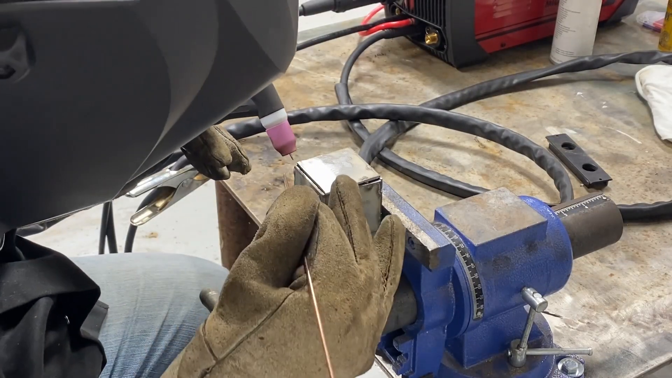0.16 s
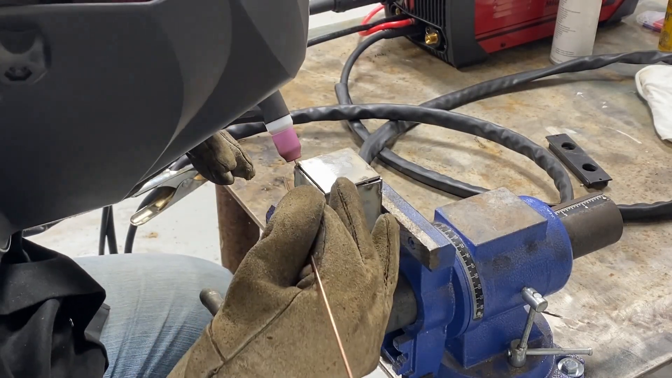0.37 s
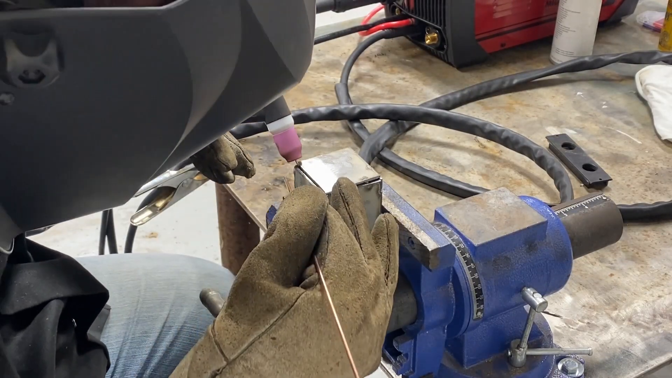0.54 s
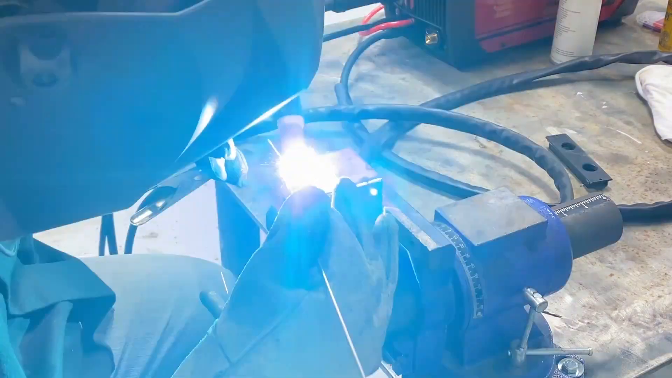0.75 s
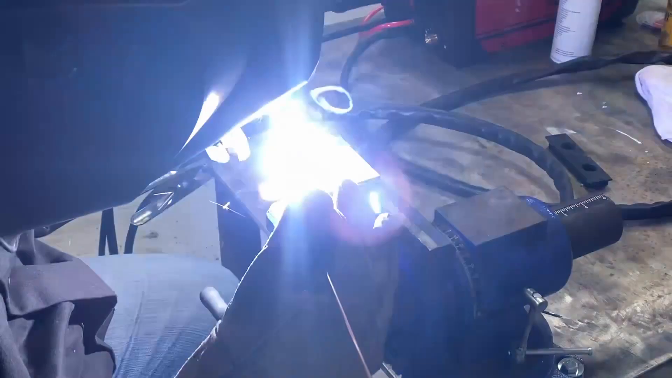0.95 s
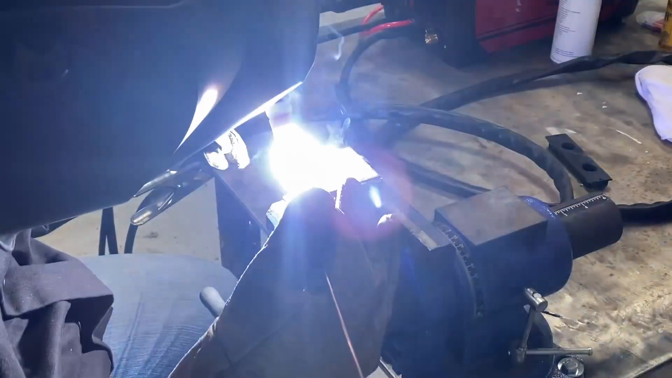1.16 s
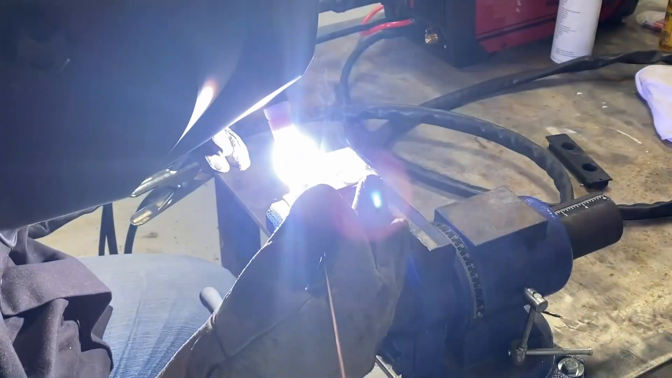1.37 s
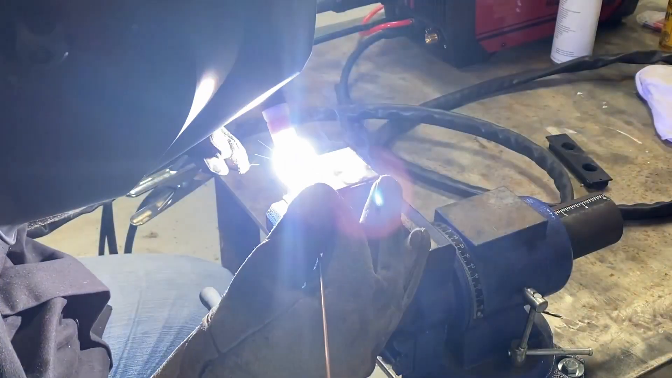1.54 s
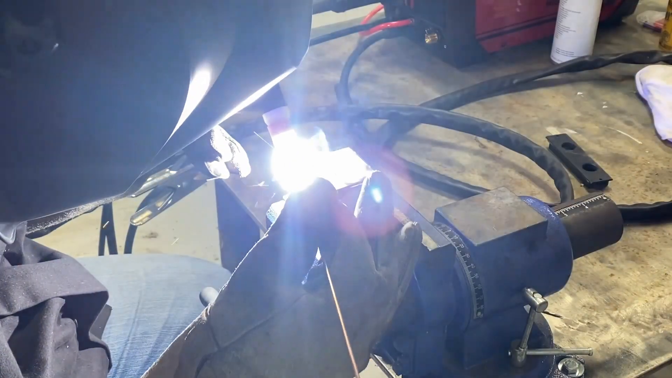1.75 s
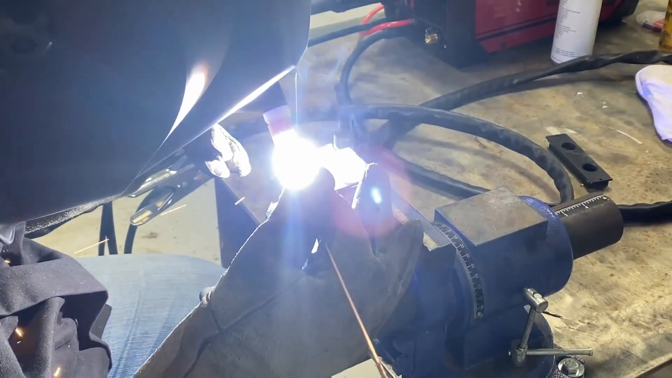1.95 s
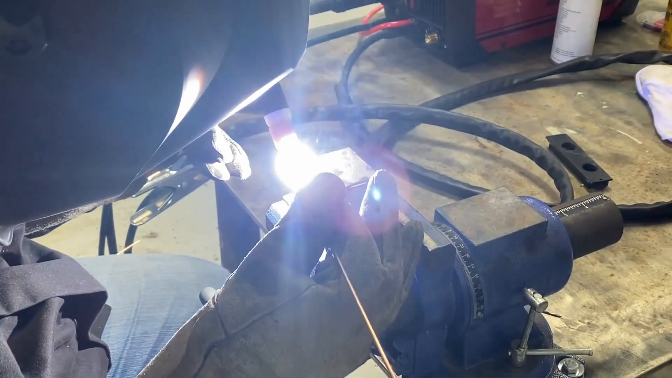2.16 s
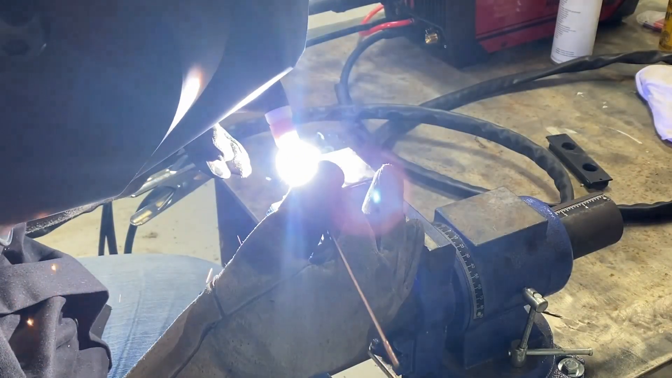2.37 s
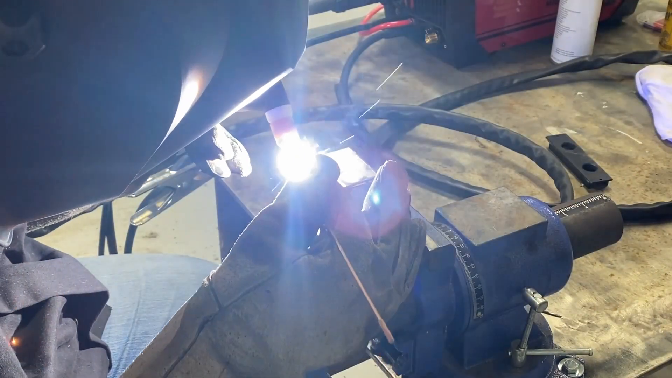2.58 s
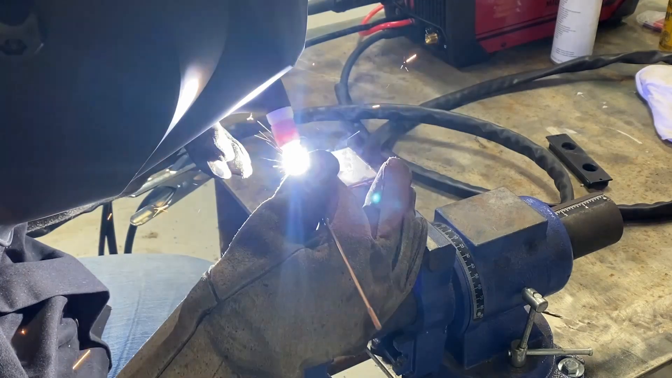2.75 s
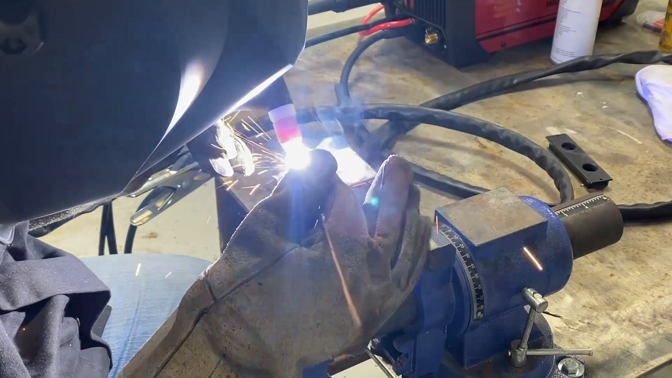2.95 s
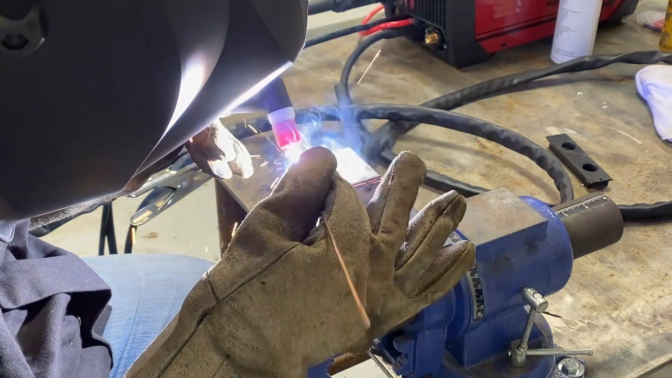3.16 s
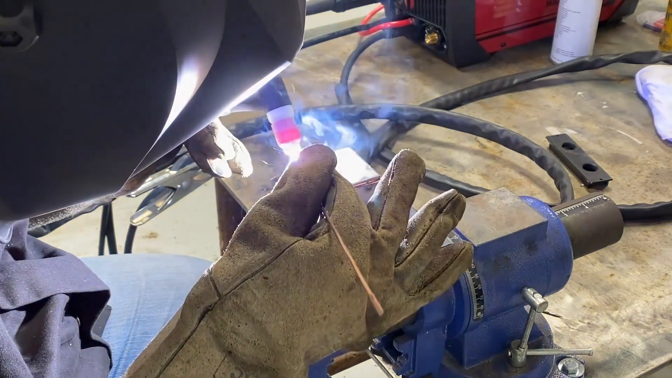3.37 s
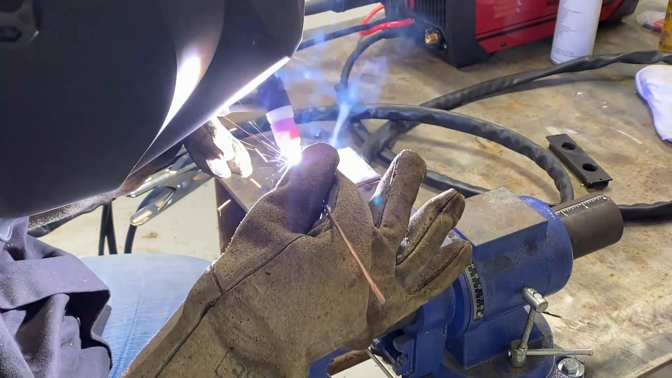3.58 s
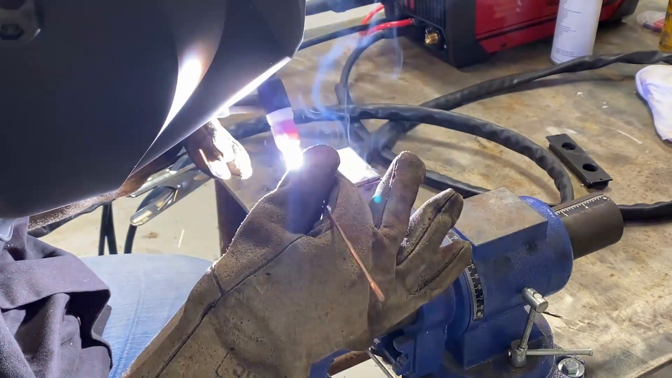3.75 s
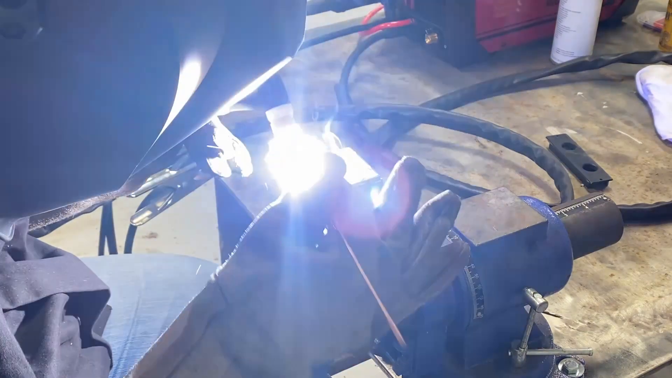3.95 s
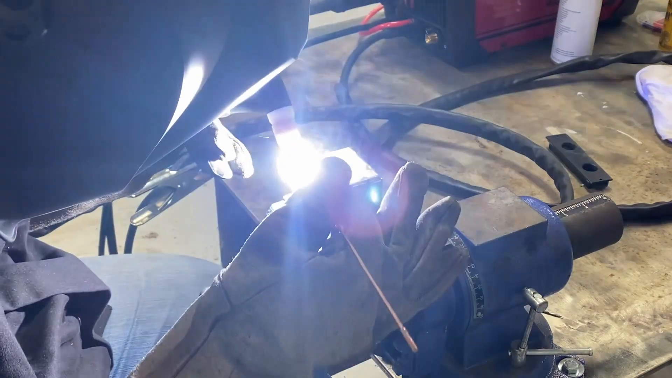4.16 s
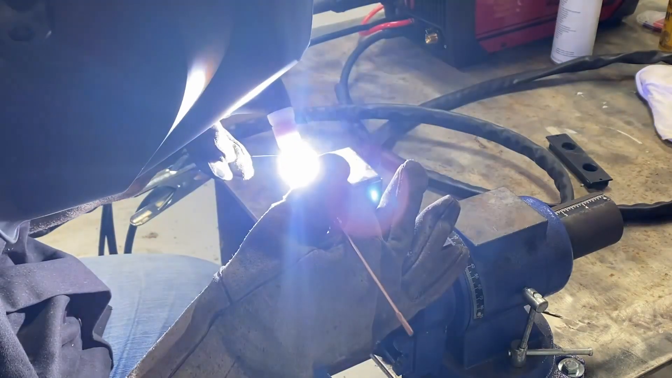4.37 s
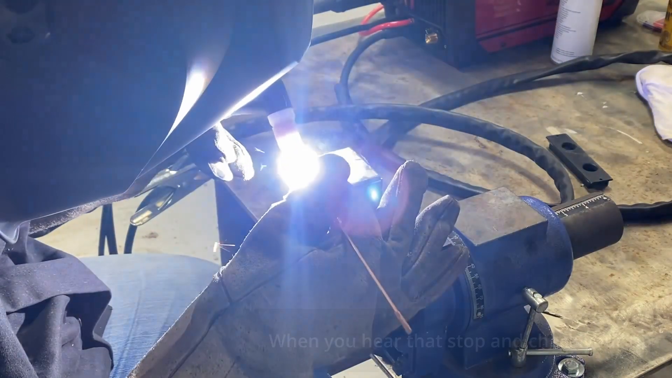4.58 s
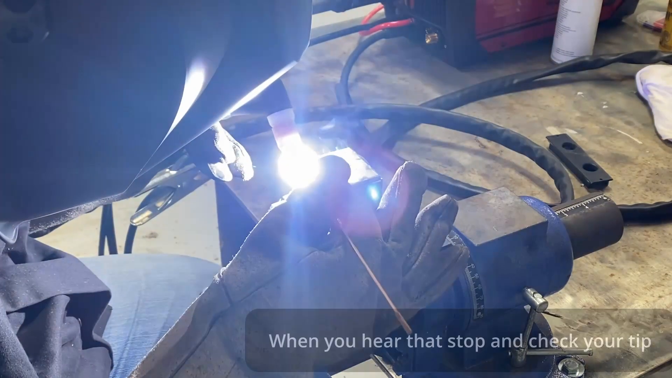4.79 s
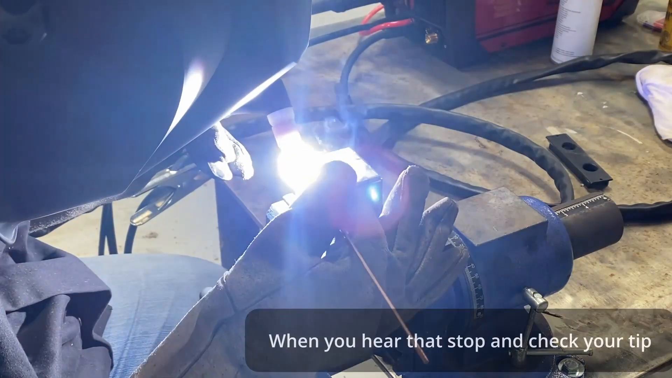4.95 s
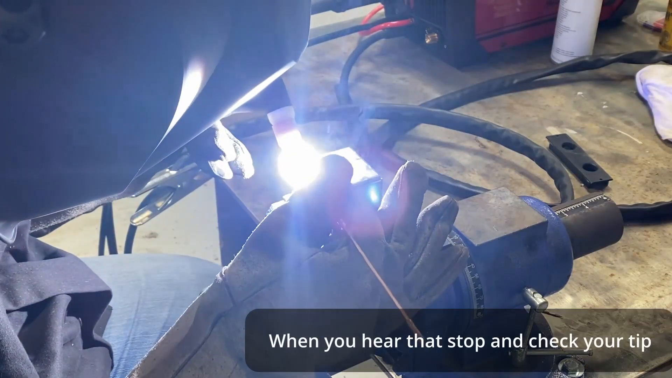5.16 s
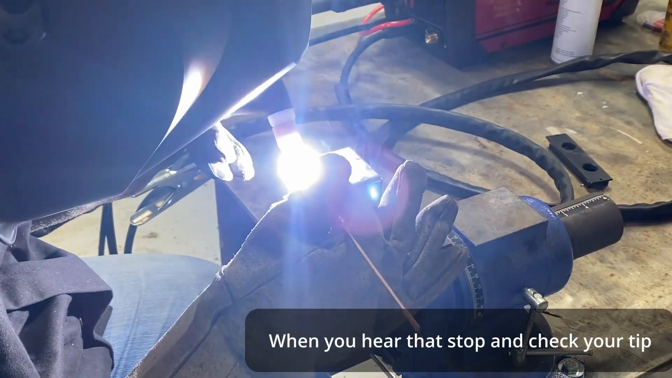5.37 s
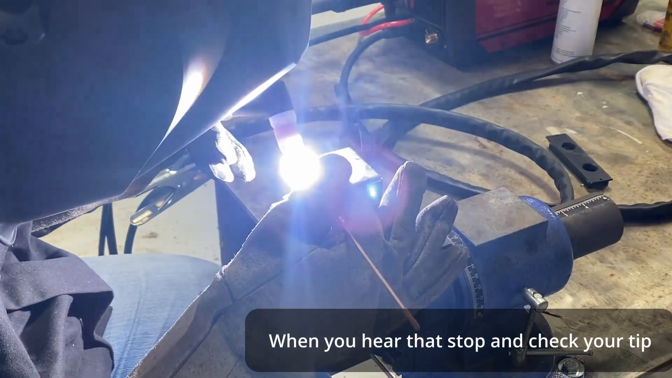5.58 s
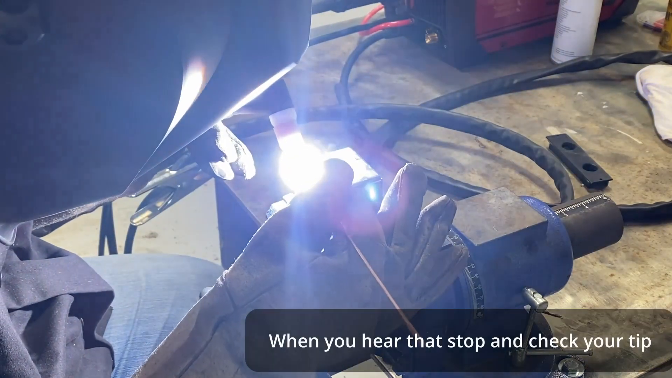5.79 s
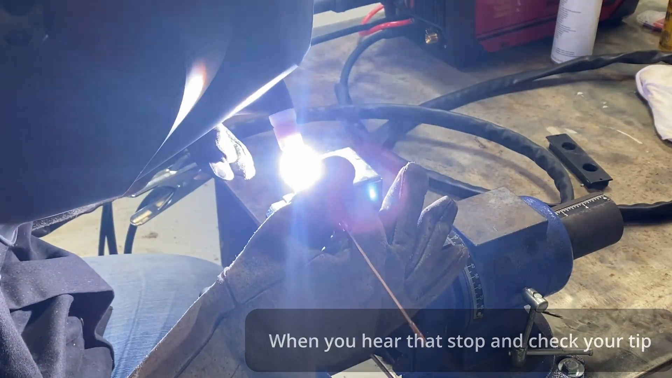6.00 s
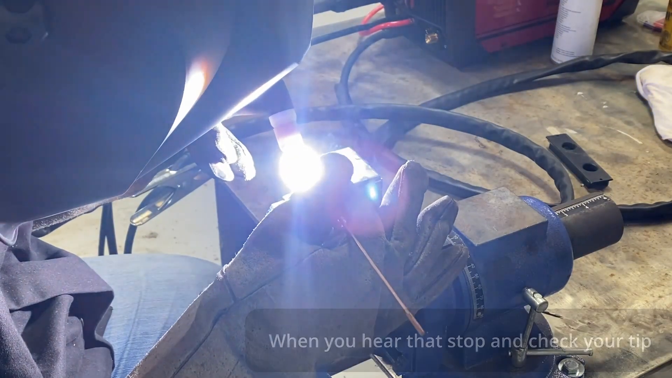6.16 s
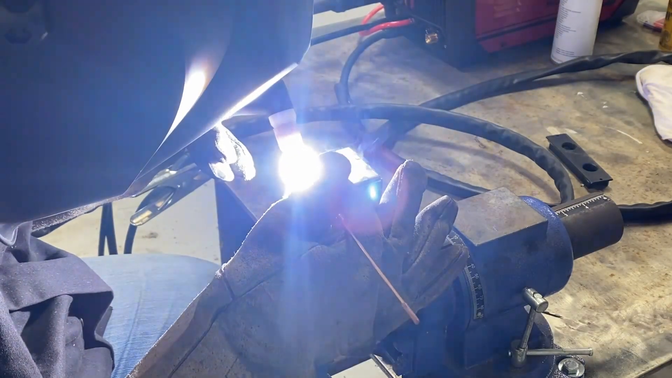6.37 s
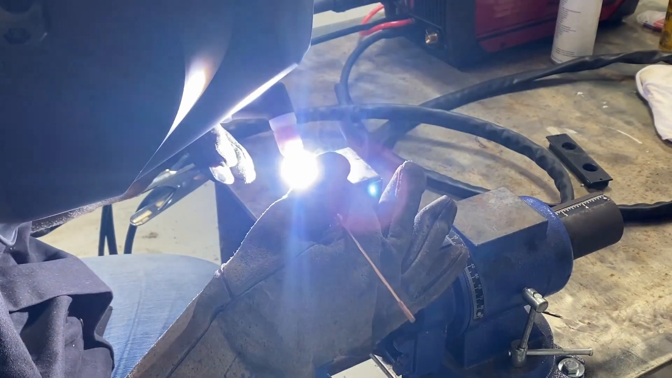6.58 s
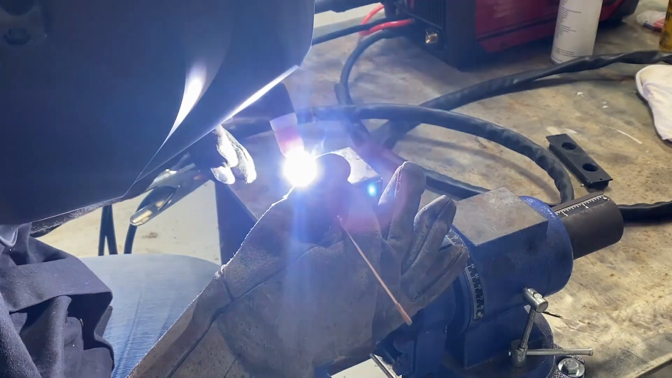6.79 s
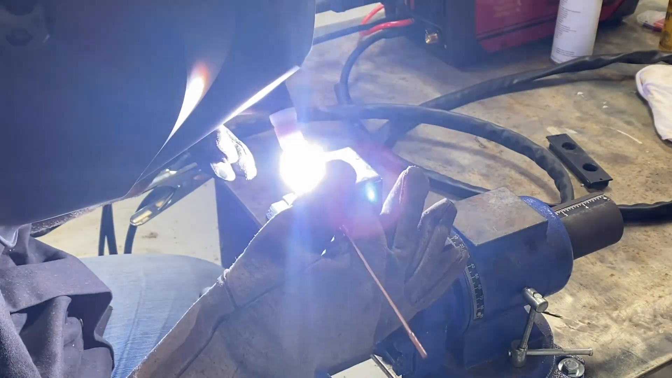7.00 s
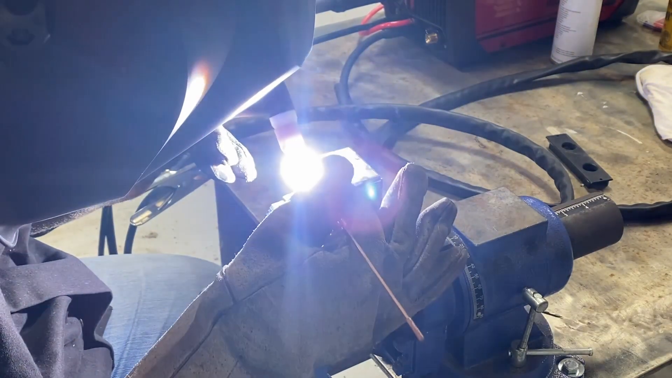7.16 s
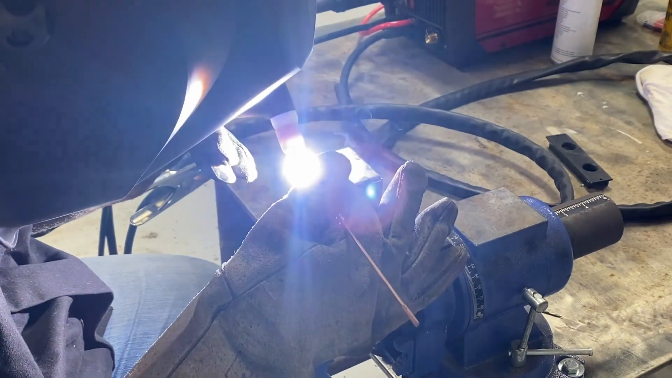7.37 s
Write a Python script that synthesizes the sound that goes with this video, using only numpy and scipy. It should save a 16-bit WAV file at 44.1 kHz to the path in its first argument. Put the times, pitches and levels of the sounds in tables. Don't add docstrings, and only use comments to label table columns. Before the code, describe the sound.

A machine fan drones, a contactor clacks, then a welding arc ignites in crackling pops and burns with a steady hiss and thin high whine.

```python
import sys
import numpy as np
from scipy import signal
from scipy.fft import rfft, irfft, next_fast_len
from scipy.io import wavfile
from scipy.ndimage import uniform_filter1d

SR = 44100
rng = np.random.default_rng(int(sys.argv[2]) if len(sys.argv) > 2 else 0)


def amplitude_ratio(level_db):
    exponent = np.asarray(level_db, float) / 20
    return 10 ** exponent


def store_pcm(level_fs):
    pcm = np.round(np.clip(level_fs, -1, 1) * 32767).astype(np.int16)
    wavfile.write(sys.argv[1], SR, np.atleast_2d(pcm).T)


N = 327691

# (frequency [Hz], likeness [0-1])
ALIKE = [(60, .996), (290, .94), (700, .87), (1410, .6), (1900, .85), (2250, .997), (3500, .95),
         (4600, .99), (5500, .9995), (6800, .9995), (7500, .985), (15000, .94)]


def clock(start):
    return np.arange(N) / SR - start


def evened(x):
    return x / np.sqrt(np.mean(x ** 2) + 1e-20)


def read(points, hz):
    f, value = np.transpose(points)
    return np.interp(np.log(hz + 1), np.log(f + 1), value)


def curves(rows, quiet=None):
    s, *columns = np.transpose(rows)
    return [np.interp(clock(0), s, c, quiet, quiet) for c in columns]


def band(x, low_hz, high_hz):
    sos = signal.butter(2, [low_hz, high_hz], "bandpass", fs=SR, output="sos")
    return signal.sosfilt(sos, x)


def coloured(x, points):
    half = read(points, np.fft.rfftfreq(4096, 1 / SR)) * np.log(10) / 20
    log_gain = np.r_[half, half[-2:0:-1]]
    taps = np.fft.ifft(np.exp(np.conj(signal.hilbert(log_gain)))).real[:2048]
    return signal.oaconvolve(np.atleast_2d(x), taps[None], axes=1)[:, :N]


def drift(rate_hz):
    knots = rng.standard_normal(int(N / SR * rate_hz) + 2)
    return evened(signal.resample(knots, N))


def likeness(hz):
    return np.clip(read(ALIKE, hz), 0, 1)[:, None]


def air(gain_db, patchy_db):
    frames, hz = N // 256 + 5, np.fft.rfftfreq(1024, 1 / SR)
    a, b, c, d, patches = rng.standard_normal((frames, 513, 5)).T
    patches = uniform_filter1d(patches, size=12, axis=0)
    patches = evened(uniform_filter1d(patches, size=14, axis=1))
    same = likeness(hz)
    left = a + 1j * b
    right = same * left + np.sqrt(1 - same ** 2) * (c + 1j * d)
    at = np.minimum(np.arange(frames) * 256, N - 1)
    z = np.array([left, right]) * amplitude_ratio(gain_db(hz[:, None], at) + patchy_db * patches)
    return signal.istft(z, nperseg=1024, noverlap=768)[1][:, :N]


def tones(lines, level_db, flutter_db, fading_db):
    out = np.zeros(N)
    for hz, db in lines:
        waver = 1.0 if hz > 6500 or 1000 < hz < 2000 else 0.68
        gain_db = db + 2.0 + level_db(hz) + flutter_db * drift(14) + fading_db * drift(3)
        phase = 2 * np.pi * hz * clock(0) + waver * drift(22) + 7 * rng.random()
        out += amplitude_ratio(gain_db) * np.sin(phase)
    return out


def fan():
    # (frequency [Hz], density [dB per Hz])
    drone_bands = [(15, -40), (25, 15.5), (70, -6.5), (165, -9), (313, 1), (365, -13.5), (518, -4.5),
                   (694, -11.5), (1400, -20), (1600, -21.5), (1760, -23.5), (1940, -23.5), (2600, -21.5),
                   (3380, -49), (5720, -120)]
    # (frequency [Hz], density [dB per Hz])
    top_bands = [(1800, -9.5), (2950, -15), (3180, 4.5), (3400, 7.5), (3750, -0.5), (5500, -6), (7000, -3),
                 (8500, -14.5), (9500, -13), (11500, -31), (14500, -23)]
    # (frequency [Hz], width [Hz], level [dB rms])
    duct_modes = [(82, 8, -56.5), (282, 10, -60), (326.25, 10, -59), (408, 58, -50.5), (512, 68, -55.5)]
    drone = amplitude_ratio(-42) * evened(air(lambda hz, at: read(drone_bands, hz), patchy_db=0.8))
    top = amplitude_ratio(-53) * evened(air(lambda hz, at: read(top_bands, hz) - 40 * (hz < 1500), patchy_db=-1.5))
    hz = np.fft.rfftfreq(N, 1 / SR)
    common, left, right = rfft(rng.standard_normal((3, N)))
    z = common + 0.34 * np.array([left, right])
    ducts = np.zeros((2, N))
    for f, width, db in duct_modes:
        ducts += amplitude_ratio(db) * evened(irfft(z / (1 + (2 * (hz - f) / width) ** 2), N))
    return drone + top + ducts


def hums():
    # (pitch [Hz], level [dB rms])
    hum_lines = [(284.5, -52.5), (325.3, -50)]
    # (time [s], lower hum [dB], upper hum [dB])
    hunting = [(0, 0, -5), (.45, 1, 2.5), (.8, -2, 0), (1.35, -3, 0), (1.6, -6, 4.5), (2.1, -2, 1),
               (2.5, -5, -1), (3.12, 5, 0.5), (3.4, -7, 1), (3.75, 7, 1), (4.25, 5, 1), (4.45, -11, 6),
               (4.8, -2, -5), (5.15, 2.5, 3), (5.8, -2, -0.5), (6.4, 3.5, 1), (7.0, 1.5, 1.5),
               (7.43, 0, -3)]
    lower_db, upper_db = curves(hunting)
    return tones(hum_lines, lambda hz: lower_db if hz < 300 else upper_db, flutter_db=2.5, fading_db=1.0)


def blade_whistles():
    # (frequency [Hz], level [dB rms])
    blade_lines = [(1615, -59.5), (1954, -63.5)]
    return tones(blade_lines, lambda hz: .1, flutter_db=2.0, fading_db=0.9)


def engine():
    # (start [s], length [s], first pitch [Hz], climb [Hz per s], loudest level [dB])
    passes = [
        (1.45, .95, 86, 12.5, -47),
        (2.35, .75, 98, 14, -57),
        (3.5, 1.3, 81.5, 21.5, -54),
    ]
    out = np.zeros(N)
    for start, length, hz, climb_hz, db in passes:
        u = np.clip(clock(start) / length, 0, 1)
        arch = np.sin(np.pi * u ** 1.8)
        near = uniform_filter1d((u > 0) * (u < 1.) * 1., size=6000)
        turns = np.cumsum(hz + climb_hz * length * u) / SR
        level_db = db + 6.0 * (arch - 1) + 6.5 + 2.7 * drift(11)
        out += near * amplitude_ratio(level_db) * np.sin(2 * np.pi * turns + 0.62 * drift(10))
    return out


def hiss():
    # (time [s], level [dB], brightness [dB per octave])
    gas_flow = [(0.47, -61, -0.63), (0.7, -56, -1.1), (0.8, -51, -0.5), (0.97, -42.5, -1.8),
                (1.15, -44.5, 2), (1.35, -46.5, -1.7), (1.65, -45, -0.8), (1.82, -45, 1.3),
                (2.1, -47, -0.05), (3.1, -48.5, 1.27), (3.9, -48, 0), (4.08, -44.5, 0), (4.4, -47.5, -1),
                (5.35, -48, 0), (6.0, -48, 0.5), (6.62, -48, -0.5), (7.05, -48.5, 1.7), (7.43, -47.5, -1)]
    level_db = curves(gas_flow, -99)[0]
    lit_db, bright_db = curves(gas_flow)
    tilt_db = 0.48 - 0.17 * (lit_db + 42.5)
    white = air(lambda hz, at: tilt_db[at] * np.log2((hz + 500) / 4500)
                + bright_db[at] * np.log2(1 + (hz / 5000) ** 2), patchy_db=1.5)
    return evened(white) * amplitude_ratio(level_db + 6.5 + 0.17 * drift(14))


def contactor():
    # (frequency [Hz], level [dB], t60 [s], lag [s])
    case_modes = [(903, -2.5, 0.16, .014), (1085, -5, 0.15, 0.022), (1360, 4, 0.045, 0.00022),
                  (1830, -7, 0.03, 0.00018), (2220, -11, 0.11, 0.00025), (2600, 0, 0.037, 0.00013)]
    closes_s = .7155
    out = np.zeros(N)
    for hz, db, t60, lag in case_modes:
        t = np.clip(clock(closes_s + lag), 0, None)
        out += amplitude_ratio(db - 39.0 - 60 * t / t60) * np.sin(2 * np.pi * hz * t)
    return out


def starter():
    # (start [s], length [s], final level [dB])
    bursts = [
        (0.716, 0.0047, -25.5),
        (0.82, 0.0071, -20),
    ]
    climb_db_per_s, drop_db, fade_db_per_s, tail_s = 800, 19, 1053, .013
    level = np.zeros(N)
    for start, length, db in bursts:
        t = clock(start + length)
        shape_db = np.where(t < 0, climb_db_per_s * t, -drop_db - fade_db_per_s * t)
        level += (t > -length) * (t < tail_s) * amplitude_ratio(db + shape_db)
    sparks = rng.standard_normal(N) * (rng.random(N) < .3)
    return amplitude_ratio(4.0) * level * evened(band(sparks, 5900, 19400))


def arc_song():
    start_s, hold_s, hz, level_db = .7145, .053, 4257, -43.5
    t = clock(start_s)
    scoop = np.exp(-(t / .005) ** 2)
    after = np.clip(t - hold_s, 0, None)
    db = level_db + 6.5 * scoop - 14 * np.minimum(after / 0.0036, 1) - 450 * after
    return (t > 0) * amplitude_ratio(db + 6.5) * np.sin(2 * np.pi * np.cumsum(hz - 210 * scoop) / SR)


def whine():
    # (frequency [Hz], level [dB rms])
    ripple_lines = [(3208, -66), (3332, -65), (3451, -67), (3741, -69.5), (3861, -60), (3984, -69.5),
                    (5340, -70.5), (5728, -63.5), (5846, -68), (5873, -65), (5993, -60), (6115, -65),
                    (7126, -56), (8791, -76), (9055, -74), (9324, -58), (9857, -75), (10390, -77),
                    (10654, -75), (13184, -78), (14250, -80), (15046, -82), (15315, -77), (15434, -87)]
    # (frequency [Hz], level [dB rms])
    more_lines = [(8530, -72), (11790, -75), (15180, -80)]
    # (frequency [Hz], level at the start [dB])
    warming = [(4000, 0.5), (5700, 0.5), (6100, -10.5), (7130, 0.5), (9320, -7.5), (10650, 12), (15300, -8)]
    # (time [s], level [dB])
    steady = [(.8, -0.5), (3.3, 0.5), (3.6, 3), (3.8, -4), (3.95, 2.5), (4.4, 0.5), (4.68, -1.5),
              (4.87, 1.5), (5.06, -0.5), (5.3, 1), (6.3, 1), (6.4, 1), (6.55, 0.5), (6.75, -1.5),
              (6.88, -5), (7.0, 1), (7.43, 0.5)]
    arc_on_s, rise_s, warm_s = .825, 0.072, 3.5
    lit = np.clip(clock(arc_on_s), 0, None)
    high_db = 0.64 + 7 * np.exp(-lit / 0.78)
    late_db = -26 * np.exp(-lit / rise_s)
    cold = np.exp(-lit / warm_s)
    steady_db = curves(steady)[0]

    def level_db(hz):
        if hz < 5000:
            group_db = late_db + 4.5
        elif hz < 6500:
            group_db = late_db + 4
        else:
            group_db = high_db + 4.1 * (hz > 14900)
        return group_db + read(warming, hz) * cold + steady_db

    speaks = 1 - np.exp(-lit / 0.0094)
    return speaks * tones(list(ripple_lines) + list(more_lines), level_db, flutter_db=1.5, fading_db=2.0)


def booms():
    # (time [s], frequency [Hz], peak level [dB], rise [s], t60 [s])
    swings = [(0.823, 200, -33, 0.0027, .04), (.9150, 240, -21, .002, 0.069), (.9150, 124, -27, .004, 0.11),
              (1.103, 169, -30, .006, .06), (1.129, 210, -26.5, 0.0018, .05),
              (3.632, 220, -29, .003, 0.066), (3.6413, 332, -20.5, .001, 0.037),
              (3.6412, 192, -30, .003, 0.077), (3.664, 400, -22, 0.0016, .05),
              (3.9865, 630, -20, 0.00046, 0.017), (3.9868, 1070, -24.5, 0.00039, .02),
              (3.994, 191, -29.5, .006, 0.091), (3.998, 302, -34, .004, 0.073),
              (4.475, 150, -39, .03, 0.36)]
    out = np.zeros(N)
    t = np.arange(SR // 2) / SR
    for start, hz, db, rise, t60 in swings:
        part = out[round(start * SR):][:len(t)]
        part += (1 - np.exp(-t / rise)) * amplitude_ratio(db - 60 * t / t60) * np.sin(2 * np.pi * hz * t)
    return out


def thump(train):
    t = np.arange(600) / SR
    turns = 257 * t + 0.5 * (1 - np.exp(-t / 0.00066))
    push = np.sin(2 * np.pi * turns) * np.exp(-t / 0.0012)
    return band(signal.oaconvolve(train, push)[:N], 73, 1900)


def sputter():
    # (start [s], peak [s], end [s], peak level [dB], thump level [dB])
    bursts = [
        (0.717, 0.715, 0.76, -34, 2),
        (.83, .902, .946, -30.5, -11),
        (.912, .924, 0.99, -30.5, 3),
        (1.08, 1.114, 1.15, -34.5, -2),
        (3.628, 3.643, 3.9, -37.5, 5),
        (3.65, 3.668, 3.673, -37.5, 3),
        (3.675, 3.684, 3.42, -37, -9),
        (.85, .875, 0.86, -42, -5),
    ]
    gather_s, scatter_s = 0.014, 0.013
    sizes = amplitude_ratio(4.5 * np.minimum(rng.exponential(1, N), 4)) * rng.choice([-1, 1], N)
    sparks = evened(sizes * (rng.random(N) < 6000 / SR))
    puffs = evened(thump(rng.standard_normal(N) * (rng.random(N) < 250 / SR)))
    level, low = np.zeros((2, N))
    for start, peak, end, db, thump_db in bursts:
        t = clock(peak)
        burning = (clock(start) > 0) * (clock(end) < 0)
        shape = burning / (1 + np.where(t < 0, -t / gather_s, t / scatter_s))
        level += amplitude_ratio(db) * shape
        low += amplitude_ratio(db + thump_db) * shape ** 3
    clumps = amplitude_ratio(3 * drift(150) + 0.5)
    return level * clumps * evened(band(sparks, 390, 9900)), low * puffs


def snaps():
    # (time [s], body peak [dB], body pitch [Hz], treble peak [dB], pressure thump [dB])
    single_snaps = [(0.4806, -13, 3770, -17, -50), (.7160, -13.5, 2800, -19.5, -45),
                    (0.8199, -13.5, 3400, -30, -44), (0.826, -29, 4000, -33, -25),
                    (.8700, -28, 3140, -38, -43), (.888, -23, 4270, -34, -37), (0.9, -22, 3500, -30, -42),
                    (0.9017, -22, 2500, -28, -37), (0.9042, -16, 2580, -20, -35),
                    (0.9084, -17, 2400, -28, -35), (0.911, -24, 3000, -25, -33),
                    (0.9145, -4, 3200, -15, -17), (0.9172, -32, 3000, -23, -40),
                    (0.9209, -19, 3500, -34, -49), (0.9205, -16, 2370, -33, -36),
                    (0.9229, -17, 3000, -35, -31), (0.9285, -21, 3500, -30, -33),
                    (0.931, -10, 3500, -26, -39), (0.937, -22, 3000, -30, -45),
                    (0.938, -24, 3000, -35, -34), (1.1157, -26, 2900, -30, -37),
                    (1.131, -16, 3500, -25, -26), (1.1410, -28, 2500, -33, -40),
                    (1.327, -23, 3500, -31, -39), (3.6339, -16, 3020, -22, -24),
                    (3.638, -22, 3000, -28, -28), (3.6414, -11, 3040, -18, -20.5),
                    (3.6531, -24, 2500, -24, -23), (3.6633, -29, 3000, -32, -25),
                    (3.6658, -23, 2200, -28, -22), (3.669, -32, 5000, -28, -27),
                    (3.6832, -28, 4000, -23, -31), (3.686, -30, 4000, -30, -36),
                    (3.9860, -2, 2500, -8.5, -31), (4.375, -25, 3480, -26, -53),
                    (5.462, -21, 3230, -23, -61), (6.3883, -20, 5600, -19.5, -43)]
    short_s, long_s, long_below_hz = 0.00011, 0.00026, 2420
    s, body_db, hz, treble_db, thump_db = np.transpose(single_snaps)[:, :, None]
    steps = np.arange(120)
    at = np.round(s * SR).astype(int) + steps
    t = (steps - 40) / SR
    length = np.clip(long_s * (long_below_hz / hz) ** 4, short_s, long_s)
    turns = t * hz + 0.17 - 0.14 * (length / short_s - 1)
    swing = np.cos(2 * np.pi * turns) * np.exp(-(t / length) ** 2)
    swing -= swing.sum(1, keepdims=True) * signal.windows.hann(120) / 59.5
    ragged = rng.standard_normal(at.shape) * 0.08 * np.exp(-steps / SR / 0.001)
    ragged[:, 0] = 1
    body, treble, push = np.zeros((3, N))
    np.add.at(body, at - 40, amplitude_ratio(body_db - 0.5) * swing)
    np.add.at(treble, at - 10, amplitude_ratio(treble_db + 17.5) * ragged)
    np.add.at(push, at[:, 0], amplitude_ratio(thump_db[:, 0] + 3.5))
    return body + band(band(treble, 5300, 11000), 4600, 17000), thump(push)


def shop(x):
    # (frequency [Hz], t60 [s])
    decay = [(250, .45), (700, .35), (2000, .58), (4000, .46), (7000, .32), (12000, .15)]
    # (frequency [Hz], gain [dB])
    echo_colour = [(200, -7), (700, 4), (1300, 4.5), (2500, 1.5), (4000, -5), (7000, 0), (12000, -7.5)]
    taps = np.zeros((3, SR // 2))
    at = np.arange(120, SR // 2 - 20, 20) + rng.integers(0, 20, (3, (SR // 2 - 121) // 20))
    np.put_along_axis(taps, at, rng.choice([-1., 1.], at.shape), 1)
    taps *= 1 + 2.7 * np.exp(-np.arange(SR // 2) / SR / 0.0081)
    hz, t, z = signal.stft(taps, SR, nperseg=128)
    apart = np.sqrt(1 - likeness(hz) ** 2)
    fall_db = 60 * t / read(decay, hz)[:, None]
    z = (z[0] + 1.8 * apart * z[1:]) * amplitude_ratio(read(echo_colour, hz)[:, None] - fall_db)
    tail = signal.istft(z, SR, nperseg=128)[1]
    return signal.fftconvolve(x[None], tail / np.linalg.norm(tail[0]), axes=1)[:, :N]


def scene():
    # (frequency [Hz], gain [dB])
    port = [(300, -4), (1200, -1.5), (2500, 1.5), (3500, 3), (4500, 1.5), (6500, -2.5), (7100, 0.9),
            (8000, -3.5), (9300, -0.5), (10000, -10), (11500, -6), (12600, -14.5), (13600, -21),
            (15500, -11)]
    crack, boom = snaps()
    fry, puff = sputter()
    arc = crack + fry + starter()
    treble = coloured(arc + amplitude_ratio(-10.5) * shop(arc) + hiss(), port)
    low = boom + puff + contactor() + booms()
    machine = fan() + hums() + blade_whistles()
    return machine + engine() + whine() + arc_song() + treble + low + amplitude_ratio(-9.5) * shop(low)


def band_limit(x):
    return signal.sosfilt(signal.butter(12, 16660, fs=SR, output="sos"), x)


def record(dry):
    # (frequency [Hz], lead [half turns])
    lead = [(0, 0), (950, .06), (1460, -.15), (2250, 0), (3400, .2), (5400, .02), (6600, 0), (7200, -.15),
            (8100, -.62), (8530, -1), (9000, -1.4), (9750, -1.92), (10400, -2.08), (11700, -2.85),
            (12400, -3.15), (13400, -3.85), (14500, -4.12), (15600, -4.85), (22050, -8)]
    # (frequency [Hz], left minus right [dB])
    balance = [(60, -0.5), (180, -1), (550, 0.5), (1650, 3.5), (2400, -2), (5000, 2.5), (15000, -0.5)]
    size = next_fast_len(N + 4096)
    hz = np.fft.rfftfreq(size, 1 / SR)
    half_lead = np.exp(1j * np.pi / 2 * np.interp(hz, *np.transpose(lead)))
    left = half_lead * amplitude_ratio(read(balance, hz) / 2)
    top_cut = amplitude_ratio(-22.0 * (hz > 15750) - 30.0 * (hz > 16660))
    bass_cut = 1 / (1 + (43 / (hz + 1)) ** 6)
    pair = rfft(dry, size) * np.array([left, 1 / left]) * top_cut * bass_cut
    out = irfft(pair, size)[:, :N]
    out = out / (1 + abs(out / .97) ** 6) ** (1 / 6)
    return band_limit(out)


dry = scene()
out = record(dry)
store_pcm(out)
```